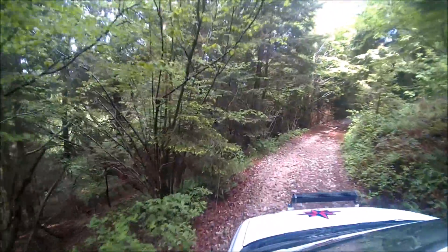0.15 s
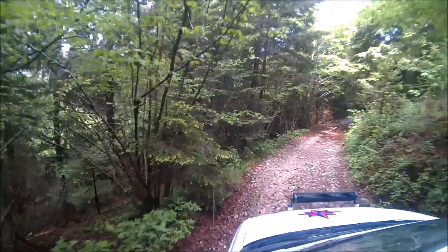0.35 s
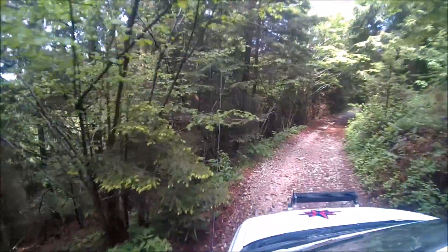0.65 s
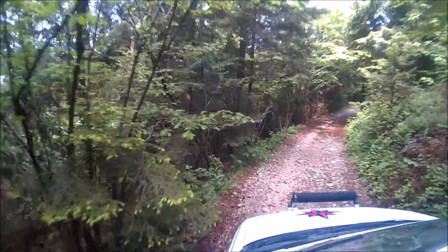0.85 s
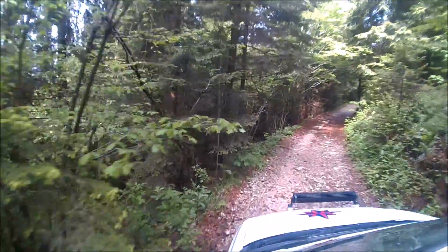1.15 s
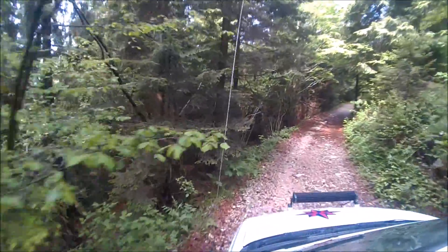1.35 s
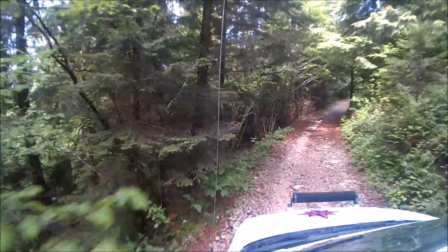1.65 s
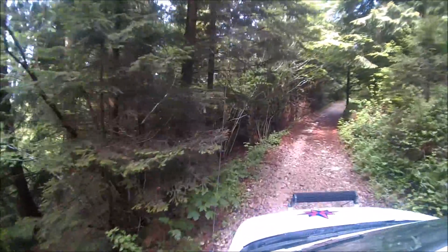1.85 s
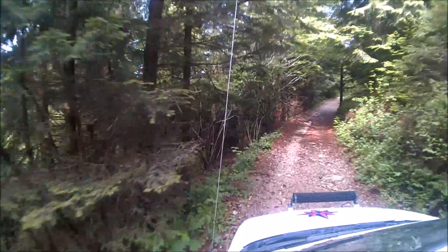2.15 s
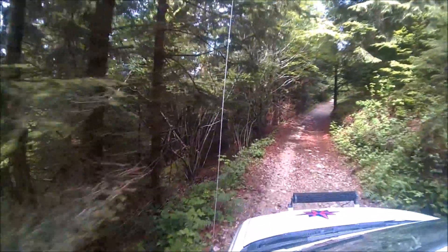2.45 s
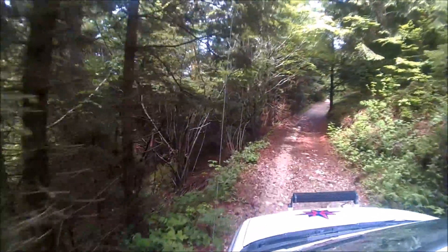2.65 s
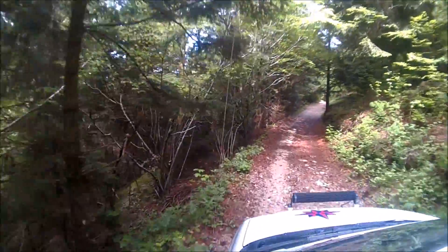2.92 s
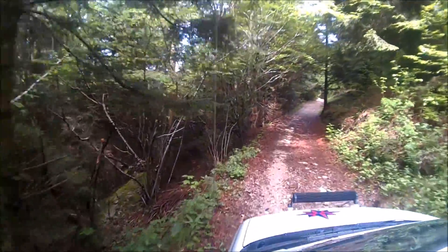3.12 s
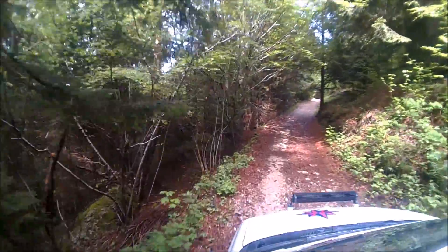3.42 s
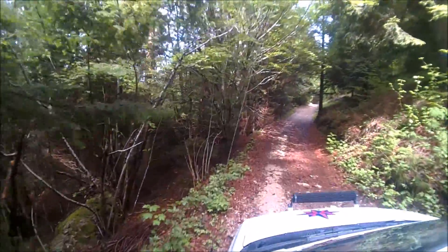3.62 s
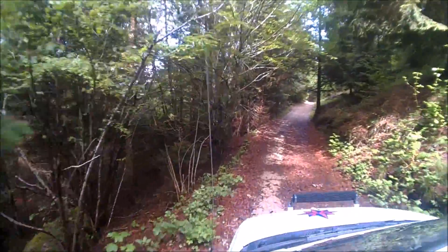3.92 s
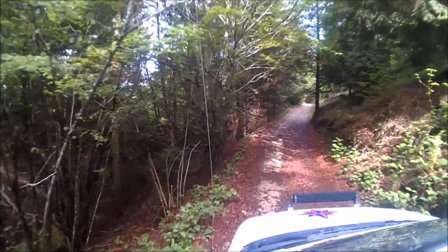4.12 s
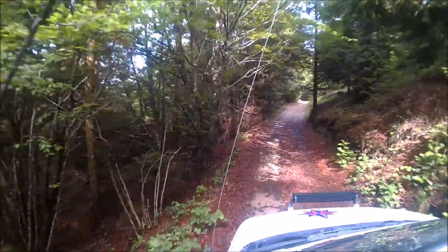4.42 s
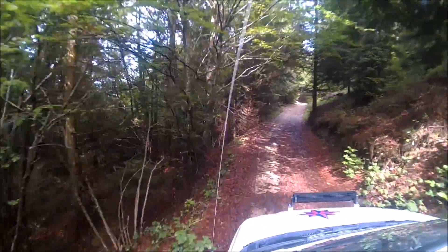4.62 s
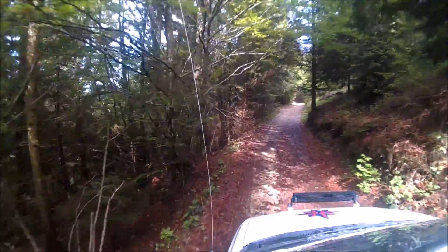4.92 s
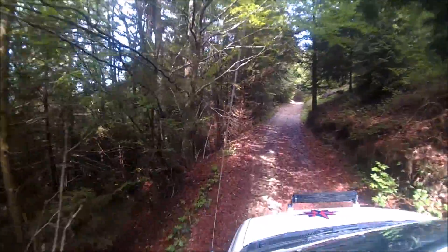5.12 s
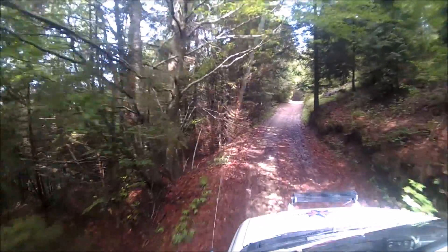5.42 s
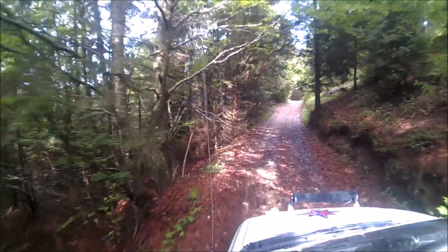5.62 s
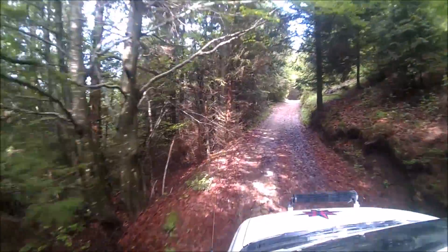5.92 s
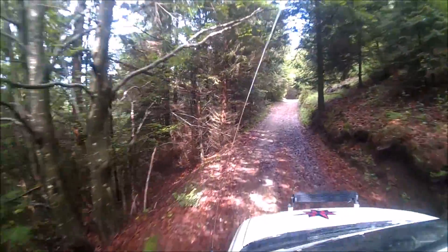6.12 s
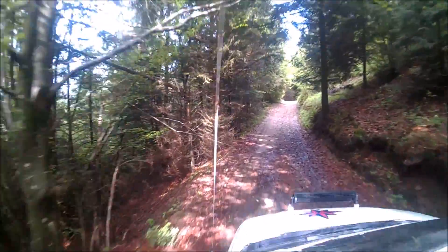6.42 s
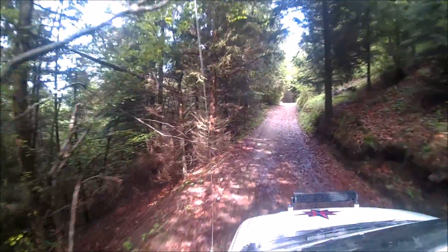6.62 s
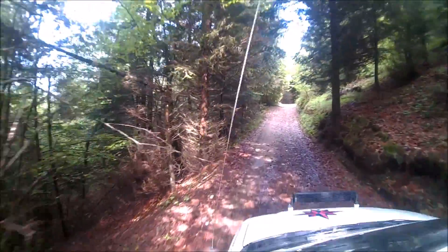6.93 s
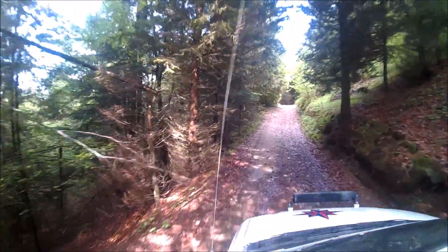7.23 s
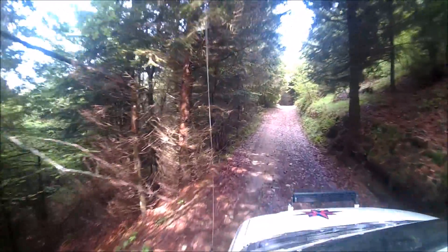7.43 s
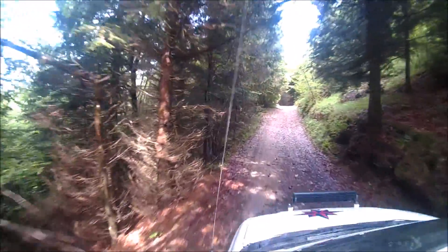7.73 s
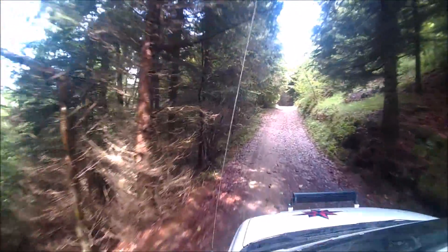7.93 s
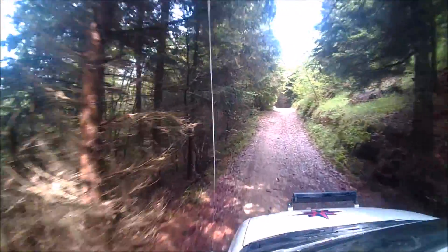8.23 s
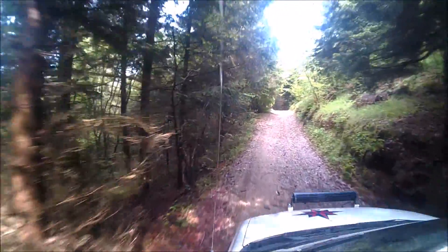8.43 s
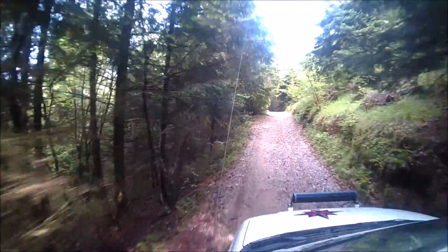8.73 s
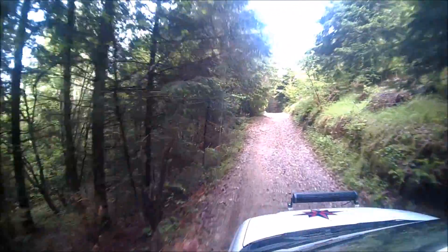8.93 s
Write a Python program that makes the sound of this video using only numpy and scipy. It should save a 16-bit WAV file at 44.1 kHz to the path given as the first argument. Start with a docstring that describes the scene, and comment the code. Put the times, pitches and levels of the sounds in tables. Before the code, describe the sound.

A dull knock and low rumble open, then a camera in a hard plastic case on a car roof rattles sharply in irregular bursts. Dull mount thuds and gravel crunch lie beneath. The clatter is densest in the first half, then thins out, leaving muffled road noise and a low engine drone rising slightly. Forest track, microphone inside the rattling case.

```python
"""A dull knock and a low rumble open the scene; then hard plastic rattles come in clusters over road noise.
A camera in a hard housing rides on the roof of a small car on a rough gravel track. Bouncing contacts ring
the modes of its shell, and bumps and jolts ring its mount. Coloured noise makes the swaying, booming roof,
the gravel and the air. Sine tones make the faint engine and a low hum; the electronics hiss and whistle.
"""
import sys
import numpy as np
from scipy import signal
from scipy.fft import rfft, irfft, next_fast_len
from scipy.io import wavfile
from scipy.ndimage import map_coordinates

SR = 44100
rng = np.random.default_rng(int(sys.argv[2]) if len(sys.argv) > 2 else 0)


def to_wav(s):
    """Save 16-bit WAV."""
    ch = np.atleast_2d(s).T  # columns
    pcm = np.round(np.clip(ch, -1, 1) * 32767)  # PCM
    wavfile.write(sys.argv[1], SR, pcm.astype(np.int16))


N = 399530


def amp(db):
    """Decibel definition: level to amplitude ratio."""
    return 10 ** (np.asarray(db) / 20)


def unit(x):
    """Normalization to an rms of 1."""
    return x / np.sqrt(np.mean(x ** 2) + 1e-20)


def curves(rows):
    """Linear interpolation: one value per sample for each column after the time."""
    s, *columns = np.transpose(rows)
    return [np.interp(np.arange(N) / SR, s, column) for column in columns]


def gravel_at(s):
    """Sampling of the gravel level [dB] at given times [s]."""
    return curves(ROAD)[2][(s * SR).astype(int)]


def wobble(knots_per_s):
    """Band-limited fluctuation: a smooth curve through random knots."""
    knots = rng.standard_normal(int(N * knots_per_s / SR) + 4)
    return map_coordinates(knots, [np.arange(N) * knots_per_s / SR])


def filtered(x, response):
    """Linear filtering: the spectrum times a complex response of frequency [Hz]."""
    m = next_fast_len(N + SR // 2)
    return irfft(rfft(x, m) * response(np.fft.rfftfreq(m, 1 / SR)), m)[..., :N]


def noise(spectrum):
    """Spectral shaping: noise of rms 1, its levels interpolated along log frequency."""
    f, db = np.transpose(spectrum)
    colour = lambda hz: amp(np.interp(np.log(hz + 1), np.log(f), db, -140, -140))
    return unit(filtered(rng.standard_normal(N), colour))


def rung(blows, modes, edge_hz, vary_db):
    """Modal superposition: blows ring resonances, each stirred differently by every blow."""
    m = 8192
    f = np.fft.rfftfreq(m, 1 / SR)
    lo, hi = 1j * f / edge_hz[0], 1j * f / edge_hz[1]
    high_pass = lo * lo / (1 + 1.536 * lo + lo * lo)
    low_pass = 1 / (1 + 1.58 * hi + hi * hi)
    edges = (high_pass * low_pass) ** 3
    rings = []
    for k, (centre, width, db) in enumerate(modes):
        resonance = 1j * f * width / (centre * centre - f * f + 1j * f * width)
        rings.append(irfft(edges * (-1) ** k * amp(db) * resonance))  # signs alternate
    top = np.abs(sum(rings)).max()
    return sum(signal.oaconvolve(blows(vary_db), ring[:m // 2] / top)[:N] for ring in rings)


def rebounds(s, count):
    """Random impact: chance draws for the spacing, size and sign of each contact."""
    return rng.random((len(s), count, 3))


def bounced(s, db, gap, loss_db, scatter_db, draw):
    """Repeated impact: contacts at uneven gaps (scale [s]) lose level, or gain it if loss is negative."""
    late = np.cumsum(gap * (.4 - .7 * np.log(draw[..., 0] + 0.0012)), 1)
    late -= late[:, :1]
    loss = loss_db * (0.59 + 1.45 * draw[:, :1, 1])  # dB per millisecond, different for each blow
    size = amp(-loss * late * 1000 - scatter_db * draw[..., 1] * (late > 0))
    # A blow's energy is shared among its contacts.
    size *= amp(db)[:, None] / np.linalg.norm(size, axis=1, keepdims=True)
    size *= np.where(draw[..., 2] > .5, 1, -1)
    at = np.round((s[:, None] + late) * SR).astype(int).ravel()

    def blows(vary_db):
        """Impulse train: the contacts with a fresh random level for each blow."""
        varied = size * amp(vary_db * rng.standard_normal((len(s), 1)))
        return np.bincount(at, varied.ravel(), N + SR)[:N]

    return blows


# Clear strikes of the camera on the shell: (time [s], nominal level [dB])
STRIKES = [(0.2704, -17), (0.306, -18), (0.319, -20.5), (0.3389, -14.5), (0.349, -17), (0.3665, -13.5),
           (0.3935, -10), (0.42, -16.5), (0.433, -28), (0.4631, -16), (0.599, -20.5), (0.6102, -17),
           (0.6324, -19.5), (0.6565, -33), (0.6785, -15.5), (0.6955, -23), (0.713, -23.5), (0.731, -26.5),
           (0.7646, -21.5), (0.802, -26), (0.81, -20), (0.851, -34.5), (0.974, -44), (1.097, -19),
           (1.121, -20), (1.14, -22.5), (1.162, -29), (1.2069, -22.5), (1.234, -25), (1.244, -27),
           (1.2633, -33.5), (1.3522, -29), (1.4103, -15.5), (1.438, -31), (1.551, -16.5), (1.6157, -11),
           (1.6475, -13), (1.6662, -18), (1.68, -18.5), (1.7055, -11.5), (1.736, -10), (1.789, -39),
           (1.833, -19.5), (1.8497, -23.5), (1.877, -17), (1.9095, -16.5), (1.9747, -19), (2.0019, -17.5),
           (2.0138, -21), (2.0414, -14.5), (2.0708, -19.5), (2.082, -13.5), (2.092, -25.5), (2.1005, -20),
           (2.1226, -21), (2.144, -25), (2.187, -13.5), (2.1964, -27.5), (2.2078, -18.5), (2.225, -24),
           (2.238, -20.5), (2.2435, -17), (2.2683, -13), (2.276, -16), (2.322, -45), (2.403, -17.5),
           (2.4463, -14), (2.464, -16.5), (2.5055, -29), (2.527, -32), (2.5606, -19.5), (2.578, -15),
           (2.5867, -14), (2.6078, -12), (2.6292, -14), (2.6425, -15.5), (2.664, -15.5), (2.671, -21),
           (2.6825, -13.5), (2.7052, -14.5), (2.7231, -15.5), (2.736, -23), (2.749, -25), (2.769, -21),
           (2.7927, -14), (2.8148, -15.5), (2.84, -15), (2.8501, -21), (2.943, -16), (3.0014, -13),
           (3.0204, -13), (3.045, -13.5), (3.0642, -23), (3.093, -26.5), (3.114, -24), (3.1394, -10.5),
           (3.1617, -17), (3.2526, -29.5), (3.271, -27), (3.296, -14), (3.3073, -24), (3.324, -21),
           (3.364, -28), (3.383, -26), (3.3933, -28.5), (3.4195, -18), (3.4403, -24.5), (3.5276, -37.5),
           (3.5376, -52), (3.558, -28.5), (3.564, -13.5), (3.579, -15), (3.592, -19.5), (3.601, -20),
           (3.6113, -14.5), (3.6173, -10), (3.631, -12.5), (3.684, -16.5), (3.7032, -24), (3.761, -18),
           (3.783, -17), (3.7944, -19), (3.805, -18), (3.846, -29), (3.8902, -12), (3.9042, -22),
           (3.9242, -19), (3.9498, -25.5), (3.9695, -31), (3.9837, -19), (4.0508, -12.5), (4.0699, -9),
           (4.079, -18), (4.1543, -19.5), (4.1865, -19), (4.2006, -27), (4.2296, -16), (4.242, -21),
           (4.274, -33.5), (4.317, -28), (4.3358, -25.5), (4.3447, -29.5), (4.3812, -27), (4.393, -22),
           (4.407, -26), (4.426, -15.5), (4.4396, -14), (4.45, -15), (4.4908, -30), (4.501, -28),
           (4.528, -30), (4.562, -22), (4.592, -18.5), (4.7325, -26.5), (4.7547, -36), (4.7816, -18.5),
           (4.803, -26), (4.8187, -41), (4.8416, -23.5), (4.8684, -15.5), (4.972, -23), (5.0352, -18),
           (5.047, -19.5), (5.06, -25), (5.078, -21), (5.191, -32.5), (5.226, -39), (5.237, -24),
           (5.277, -32), (5.294, -44), (5.3173, -26), (5.328, -20.5), (5.346, -19.5), (5.3598, -15),
           (5.404, -32), (5.4126, -27), (5.4662, -16), (5.479, -21), (5.4925, -22), (5.5072, -17),
           (5.5778, -29), (5.5926, -21), (5.632, -20.5), (5.65, -24.5), (5.672, -23), (5.7231, -17),
           (5.7354, -21.5), (6.0218, -34.5), (6.117, -29), (6.13, -30), (6.221, -44.5), (6.2913, -23.5),
           (6.3054, -23), (6.3297, -19.5), (6.343, -25), (6.3535, -20.5), (6.371, -22), (6.381, -24),
           (6.3916, -18), (6.4037, -29), (6.417, -19.5), (6.428, -21), (6.4456, -18.5), (6.455, -21),
           (6.467, -30.5), (6.4766, -22), (6.493, -29), (6.5717, -36.5), (6.656, -18.5), (6.67, -25),
           (6.691, -35), (6.772, -32), (6.818, -23), (6.9173, -35), (6.958, -27), (7.0115, -25.5),
           (7.039, -22), (7.062, -32.5), (7.0857, -36), (7.106, -27), (7.1311, -16.5), (7.216, -33),
           (7.2397, -39.5), (7.2663, -26), (7.2905, -26.5), (7.3669, -17), (7.422, -21), (7.434, -22),
           (7.452, -14), (7.464, -25), (7.502, -12.5), (7.528, -36), (7.571, -25.5), (7.9342, -29.5),
           (8.104, -24), (8.1456, -29.5), (8.1554, -31.5), (8.1762, -25.5), (8.2216, -28), (8.633, -27.5),
           (8.697, -35), (8.8416, -28.5)]
# Shell resonances: (frequency [Hz], width [Hz], relative level [dB])
SHELL_MODES = [(1495, 750, -16), (2126, 132, -6.5), (2739.5, 205, 2), (2970, 249, 4.5), (3282, 309, -3),
               (4144, 230, -10.5), (4270, 323, -13)]
# Thin wall resonances: (frequency [Hz], width [Hz], relative level [dB])
WALL_MODES = [(6700, 830, -6), (9870, 520, -5.5), (12650, 1930, -10), (14440, 1600, -16.5)]
SHELL_EDGES_HZ, WALL_EDGES_HZ = (900, 4600), (5500, 15500)
BOUNCE_S = 0.0019  # scale of the gaps between contacts
GRAZE_S, GRAZE_DB = 0.0013, 17  # scale of a scrape's lead, and how much weaker it is than its strike
CRACK_S = 0.00045  # decay time constant of a contact's noise burst


def rattle():
    """Impact excitation: contacts ring the shell and crack, brighter and shorter when harder."""
    s, db = np.transpose(STRIKES)
    s, draw = s - .0011, rebounds(s, count=5)
    strike_loss = np.clip(2.03 + 0.028 * db, .4, 3)[:, None]
    body = bounced(s, db + 2.0, gap=BOUNCE_S, loss_db=strike_loss, scatter_db=3, draw=draw)
    # A light scrape leads into each strike.
    graze_s = s - GRAZE_S * (.5 + rng.exponential(size=len(s)))
    graze = bounced(graze_s, db - GRAZE_DB, gap=.0007, loss_db=-2.0, scatter_db=0.0,
                    draw=rebounds(s, count=4))
    tick_db = 1.473 * db - 14.5 + 3 * rng.standard_normal(len(s))
    tick = bounced(s, tick_db, gap=BOUNCE_S, loss_db=2.5, scatter_db=9.0, draw=draw)
    dying = np.exp(-np.arange(300) / SR / CRACK_S)

    def crack(vary_db):
        """Noise burst: random pressure under a decaying envelope at each contact."""
        envelope = signal.oaconvolve(np.abs(tick(vary_db)), dying)[:N]
        return envelope * rng.standard_normal(N) / np.linalg.norm(dying)

    shell = rung(lambda vary_db: body(vary_db) + graze(vary_db), SHELL_MODES, SHELL_EDGES_HZ, vary_db=2.5)
    return shell + rung(crack, WALL_MODES, WALL_EDGES_HZ, vary_db=4.0)


PATTER_PER_S, PATTER_DB = 90, 31.5  # stray contacts: nominal strike level over the gravel level


def chatter():
    """Clustered random impact: faint contacts, mostly after strikes, and patter that follows the gravel."""
    s, db = np.repeat(STRIKES, 7, axis=0).T
    patter_s = rng.random(round(PATTER_PER_S * N / SR)) * N / SR
    patter_db = PATTER_DB + gravel_at(patter_s)
    s, db = np.r_[s, patter_s], np.r_[db, patter_db]
    draw = rng.standard_normal((len(s), 2))
    faint_s = np.abs(s + 0.013 + 0.015 * draw[:, 0])
    faint_db = 1.16 * db - 34 + 6.2 * draw[:, 1]
    faint = bounced(faint_s, faint_db, gap=0.001, loss_db=8.0, scatter_db=4.0, draw=rebounds(s, count=6))
    shell = rung(faint, SHELL_MODES, SHELL_EDGES_HZ, vary_db=7.5)
    return shell + amp(-19.0) * rung(faint, WALL_MODES, WALL_EDGES_HZ, vary_db=3.5)


# Bumps in the mount: (time [s], nominal level [dB], thud level relative to it [dB])
BUMPS = [(0.018, -22.5, -9.5), (1.496, -28.5, -30), (1.529, -19, -15), (1.933, -25.5, -16),
         (2.121, -25.5, -30), (2.406, -26, -12), (2.469, -32, -7.5), (2.604, -23, -3.5),
         (2.825, -21.5, -13), (2.859, -14, -34), (2.906, -29.5, -2), (2.952, -25, -29), (2.981, -27.5, 7),
         (3.06, -25.5, -8.5), (3.268, -12, -12.5), (3.325, -22.5, -19), (3.434, -29.5, -10),
         (3.479, -25, -13), (3.588, -19, -1.5), (3.615, -31.5, 4), (3.856, -19, -6), (3.869, -25, -2.5),
         (4.02, -19, -10), (4.109, -27, -10), (4.219, -20.5, -24), (4.355, -28.5, -10), (4.387, -26, -2),
         (4.451, -27.5, -13), (4.47, -25, -1), (4.8, -26.5, -13), (4.835, -25.5, -8), (5.161, -37, -22),
         (8.503, -34.5, -30)]
# Mount resonances: (frequency [Hz], width [Hz], relative level [dB])
MOUNT_MODES = [(1062, 135, 0.5), (1275, 80, 5), (1735, 93, -6), (2063, 175, -4.5)]
# Bracket resonances: (frequency [Hz], width [Hz], relative level [dB])
BRACKET_MODES = [(46, 6.5, 10), (122.6, 17.5, 9), (269, 57, -12.5), (338, 80, -5.5), (443, 68, -5),
                 (524, 38, -8), (780, 210, -15)]
MOUNT_EDGES_HZ, BRACKET_EDGES_HZ = (850, 3600), (25, 950)


def knocks():
    """Structure-borne impact: bumps give a long shudder in the mount and a thud in the bracket."""
    s, db, thud_db = np.transpose(BUMPS)
    shudder = bounced(s + .001, db + 3.5, gap=.0018, loss_db=0.88, scatter_db=1.0,
                      draw=rebounds(s, count=20))
    thud = bounced(s + 0.0014, db + thud_db + 1.0, gap=.004, loss_db=0.2, scatter_db=1.0,
                   draw=rebounds(s, count=4))
    mount = rung(shudder, MOUNT_MODES, MOUNT_EDGES_HZ, vary_db=2.5)
    return mount + rung(thud, BRACKET_MODES, BRACKET_EDGES_HZ, vary_db=2.0)


JOLTS_PER_S, JOLT_DB, JOLT_SCATTER_DB = 30, 11, 3.5  # level offset over the gravel, and its scatter
JOLT_GROWS = 1.45  # dB per dB of gravel


def jolts():
    """Random impact: small stones jolt the mount, harder on rough ground."""
    draw = rng.random((round(JOLTS_PER_S * N / SR), 2))
    s = draw[:, 0] * N / SR
    gravel_db = gravel_at(s)
    db = gravel_db.mean() + JOLT_GROWS * (gravel_db - gravel_db.mean()) + JOLT_DB
    db = db - JOLT_SCATTER_DB * np.log(draw[:, 1] + 0.033)
    shudder = bounced(s, db, gap=0.0017, loss_db=0.6, scatter_db=6.5, draw=rebounds(s, count=10))
    return rung(shudder, MOUNT_MODES, MOUNT_EDGES_HZ, vary_db=3.0)


# Road noise before fluctuation: (time [s], sway level [dB], boom level [dB], gravel level [dB])
ROAD = [(0.0, -36, -39, -59.5), (0.2, -46.5, -47.5, -56.5), (0.38, -32, -38, -51.5),
        (0.78, -43.5, -41, -54.5), (1.11, -38, -46.5, -56), (1.61, -39.5, -38.5, -53.5),
        (2.22, -33.5, -38.5, -51), (2.34, -40, -41.5, -56), (2.57, -36.5, -35, -51),
        (2.98, -35, -35.5, -50.5), (3.22, -38, -44, -54.5), (3.58, -33.5, -36, -52), (3.8, -38, -38, -51),
        (4.45, -37, -38.5, -54.5), (5.17, -42, -47, -57.5), (5.45, -35.5, -46, -55),
        (6.08, -49, -44.5, -59), (6.41, -42, -48, -57), (8.76, -41.5, -51.5, -57),
        (9.06, -48, -49.5, -57.5)]
# Roof sway spectrum: (frequency [Hz], relative level per Hz [dB])
SWAY_SPECTRUM = [(15, -29.5), (30, -6.5), (40.5, -5), (45, -2.5), (52, -17), (65, -7.5), (80, -50.5)]
# Roof boom spectrum: (frequency [Hz], relative level per Hz [dB])
BOOM_SPECTRUM = [(45, -43.5), (65, -12), (82, -10), (93, -2), (105, -11.5), (114, -5), (121, 2.5),
                 (128, -5.5), (150, -12.5), (175, -23), (300, -37.5)]
# Narrow ringing of a roof panel: (frequency [Hz], relative level per Hz [dB])
PANEL_SPECTRUM = [(380, -42), (410, -9), (425, -2), (440, -15), (545, -11.5), (590, -23.5)]
# Gravel through the shell: (frequency [Hz], relative level per Hz [dB])
GRAVEL_SPECTRUM = [(150, -31.5), (200, 1.5), (315, -8.5), (450, -5.5), (660, -17), (879, -11), (999, -3),
                   (1250, 3.5), (1600, -10.5), (2000, -1.5), (2450, -12.5), (3200, -47.5)]
# Air and tyres through the shell: (frequency [Hz], relative level per Hz [dB])
AIR_SPECTRUM = [(1500, -32.5), (2450, -1), (2900, 3), (3300, -3), (3800, -16.5), (4250, -13), (5200, -30),
                (6000, -41)]
ROCK_HZ, ROCK_DB = 39.24, 2  # centre of the rocking pitch; its amplitude over the sway noise's rms
PANEL_DB, PANEL_GROWS = -21, 1.27  # offset from the mean boom; dB per dB of boom
AIR_DB, AIR_GROWS = -66, 0.13  # mean level; dB per dB of gravel


def road():
    """Broadband excitation and transmission: the roof sways, booms and rings; gravel and air pass the shell."""
    sway_db, boom_db, gravel_db = curves(ROAD)
    rock = np.sin(2 * np.pi * np.cumsum(ROCK_HZ + 3 * wobble(6.8)) / SR)
    sway = amp(sway_db + 0.84 * wobble(2.8)) * unit(noise(SWAY_SPECTRUM) + amp(ROCK_DB) * rock)
    boom = amp(boom_db + 1.32 * wobble(9.2)) * noise(BOOM_SPECTRUM)
    panel_db = boom_db.mean() + PANEL_DB + PANEL_GROWS * (boom_db - boom_db.mean())
    panel = amp(panel_db + 6.5 * wobble(14)) * noise(PANEL_SPECTRUM)
    lumpy = np.clip((gravel_db + 62) / 12, .2, 1)  # rougher ground crunches more unevenly
    crunch_db = gravel_db + lumpy * (5.7 * wobble(25) + 4.86 * wobble(130))
    crunch = amp(crunch_db) * noise(GRAVEL_SPECTRUM)
    air_db = AIR_DB + AIR_GROWS * (gravel_db - gravel_db.mean())
    air = amp(air_db + 2.8 * wobble(41)) * noise(AIR_SPECTRUM)
    return sway + boom + panel + crunch + air


# Engine fundamental before wavering: (time [s], frequency [Hz])
ENGINE_SPEED = [(5.8, 52.0), (7.1, 52.0), (7.6, 53.3), (8.55, 57.4), (9.06, 57.0)]
# Multiples of the engine's fundamental: (frequency ratio [1])
ENGINE_ORDERS = [1, 2, 4, 12]
# Level of each multiple under full load: (rms level [dB])
ORDER_LEVELS = [-51.5, -53, -76.5, -77]
LOAD_S, IDLE_DB = (5.8, 7.8), -12  # the load grows over this span; level before it, relative to full load


def engine():
    """Harmonic series: sines at multiples of one frequency, which rise together under load."""
    t = np.arange(N) / SR
    turn = 2 * np.pi * np.cumsum(curves(ENGINE_SPEED)[0] + 0.082 * wobble(4.7)) / SR
    orders = sum(amp(db) * np.sin(k * turn) for k, db in zip(ENGINE_ORDERS, ORDER_LEVELS))
    return np.sqrt(2) * amp(np.interp(t, LOAD_S, (IDLE_DB, 0))) * orders


# Appearances of the low hum: (start [s], length [s])
HUM_SPANS = [(4.502, 1.4), (6.44, 1.22)]
HUM_HZ, HUM_DB, HUM_FADE_S = 207, -65, .2  # mean pitch, rms level before wavering, fade


def hum():
    """Pure tone: a sine wavers slightly about a fixed pitch, fading in and out."""
    t = np.arange(N) / SR
    on = sum(np.clip(np.minimum(t - s, s + length - t) / HUM_FADE_S, 0, 1) for s, length in HUM_SPANS)
    phase = 2 * np.pi * np.cumsum(HUM_HZ + 1.5 * wobble(13)) / SR
    return np.sqrt(2) * on * amp(HUM_DB + 3 * wobble(7)) * np.sin(phase)


def scene():
    """Superposition: all sources add."""
    return (rattle() + chatter() + knocks() + jolts() + road() + engine() + hum())[None]


# Bands dulled by the microphone port: (frequency [Hz], width [Hz])
PORT_NOTCHES = [(6000, 260), (8000, 1030)]
# Electronic hiss: (frequency [Hz], relative level per Hz [dB])
HISS_SPECTRUM = [(5000, -28), (8500, -19), (10000, -7.5), (14000, -7), (15500, -8), (16600, -22)]
# Electronic whistle: (frequency [Hz], rms level before wavering [dB])
WHISTLE_TONES = [(14793, -87), (14885, -88)]
TOP_HZ = 16650  # nothing passes from here up


def record(dry):
    """Notch filtering and self-noise: the port dulls two bands, the electronics hiss and whistle."""
    def port(f):
        """Anti-resonance: each notch cuts its centre to a tenth."""
        notches = [(c * c - f * f + .1j * f * w) / (c * c - f * f + 1j * f * w) for c, w in PORT_NOTCHES]
        return np.prod(notches, axis=0)

    t = np.arange(N) / SR
    whistle = sum(np.sqrt(2) * amp(db + wobble(25)) * np.sin(2 * np.pi * hz * t) for hz, db in WHISTLE_TONES)
    hiss = amp(-84.0 + wobble(60)) * noise(HISS_SPECTRUM)
    return filtered(filtered(dry, port) + whistle + hiss, lambda hz: hz < TOP_HZ)


dry = scene()
out = record(dry)
to_wav(out)
```